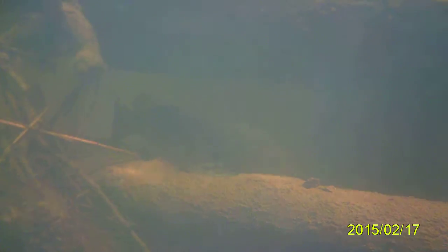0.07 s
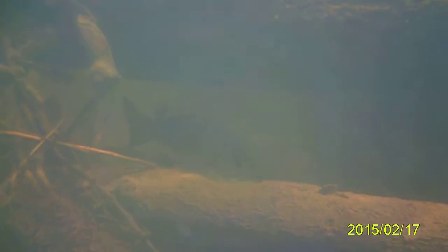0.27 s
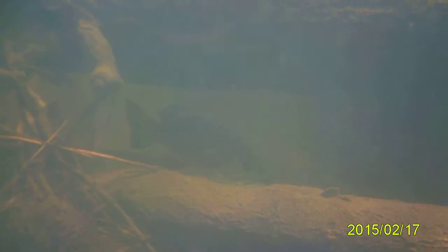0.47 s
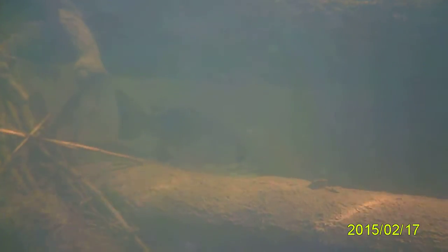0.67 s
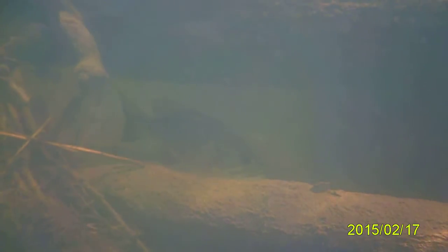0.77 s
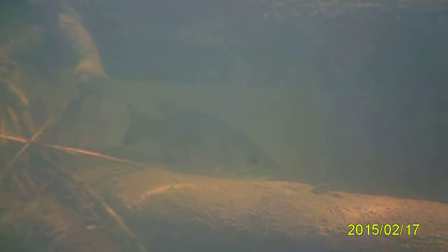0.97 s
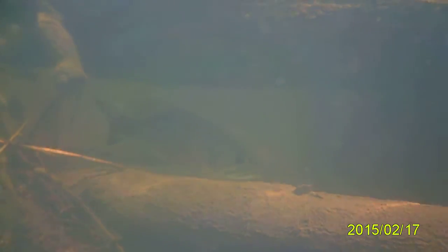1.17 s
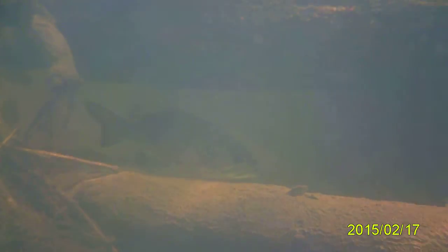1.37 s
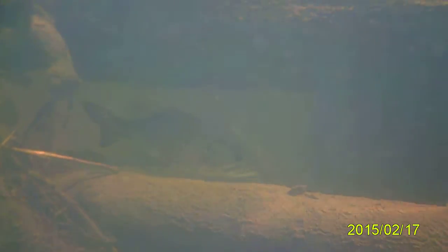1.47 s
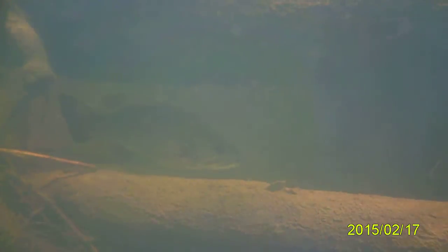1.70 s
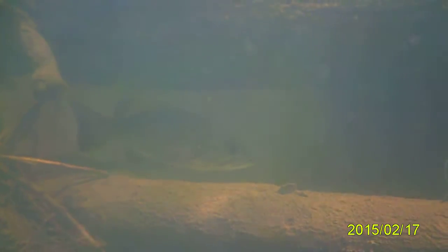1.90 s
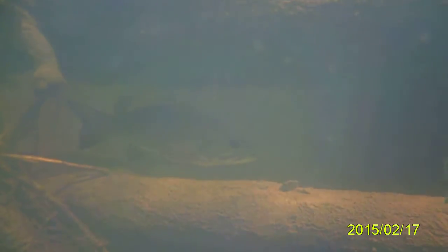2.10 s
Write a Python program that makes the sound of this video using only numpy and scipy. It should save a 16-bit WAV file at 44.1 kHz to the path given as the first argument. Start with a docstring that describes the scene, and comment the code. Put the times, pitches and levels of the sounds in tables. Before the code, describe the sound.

Dull hollow knocks and bubble pops strike a sealed camera underwater, strongest as a quick cluster near 0.7 seconds, then single knocks around 1.6 and 2.0; soft thumps, low river rumble and faint electronic hiss continue.

```python
"""Sealed camera in a slow river

The current pushes on the shell in soft low thumps, and bubbles pop against it as sine bursts of rising pitch.
The air pocket inside rings near 500 Hz and muffles the water above it; noise makes the rumble and murmur.
Under this lie the hiss of the electronics, throbbing in the treble, and a faint whine that switches on and off."""
import sys
import numpy as np
from scipy import signal
from scipy.fft import rfft, irfft
from scipy.io import wavfile

SR = 44100
rng = np.random.default_rng(int(sys.argv[2]) if len(sys.argv) > 2 else 0)


def to_wav(s):
    """Save 16-bit WAV."""
    ch = np.atleast_2d(s).T  # columns
    pcm = np.round(np.clip(ch, -1, 1) * 32767)  # PCM
    wavfile.write(sys.argv[1], SR, pcm.astype(np.int16))


N = 94638

# bubbles against the shell: (t/s, level/dB, starting f/Hz, life/s, level of the shove on the shell/dB,
# direction +1 out -1 in)
BUBBLES = [(0.3591, -27, 255, 0.0069, -23, -1), (0.5794, -21, 302.6, 0.0041, -26, -1),
           (0.7056, -5, 348, 0.005, -15.5, -1), (0.7188, -5, 285.5, 0.0034, -19, -1),
           (0.725, -10.5, 350, 0.0028, -36.5, 1), (0.848, -38, 373, 0.027, -55, 1),
           (1.3345, -28, 327, 0.0091, -50, -1), (1.45, -37.5, 390, 0.014, -57, 1),
           (1.558, -31.5, 376, .007, -52.5, 1), (1.5709, -12, 370, 0.0035, -25.5, 1),
           (1.7060, -35.5, 300, 0.0042, -27, 1), (1.7850, -39, 430, 0.01, -56, 1),
           (1.8590, -40.5, 300, 0.01, -29, 1), (1.989, -12, 340, 0.007, -21, 1),
           (2.126, -38.5, 425, 0.014, -37.5, 1)]


def amp(db):
    """dB to gain."""
    return 10 ** (np.asarray(db) / 20)


def rms_one(x):
    """Scale to rms 1."""
    return x / np.sqrt(np.mean(x ** 2) + 1e-20)


def level_curve(rows):
    """Straight lines between (t/s, level/dB) points, one value per sample."""
    s, db = np.transpose(rows)
    return np.interp(np.arange(N) / SR, s, db)


def drift(rate_hz):
    """Random wandering of rms 1: white noise through two equal low-pass poles at the given rate."""
    r = np.exp(-2 * np.pi * rate_hz / SR)
    noise = rng.standard_normal(N + SR)
    return rms_one(signal.lfilter([1], [1, -2 * r, r * r], noise)[SR:])   # first second settles the filter


def coloured(points):
    """Noise of rms 1, its spectrum drawn through (f/Hz, level/dB) points along log frequency."""
    hz, db = np.transpose(points)
    grid = np.arange(1, N // 2 + 2) * SR / N
    gain = amp(np.interp(np.log(grid), np.log(hz), db))
    return rms_one(irfft(rfft(rng.standard_normal(N)) * gain, N))


def resonate(x, hz, t60):
    """One two-pole resonance, about gain 1 at its peak, ringing down 60 dB in t60 seconds."""
    r = amp(-60 / (t60 * SR))
    w = 2 * np.pi * hz / SR
    return signal.lfilter([(1 - r * r) / 2, 0, (r * r - 1) / 2], [1, -2 * r * np.cos(w), r * r], x + 1e-18)


def gate(spans, edge_s):
    """1 inside the (t/s, length/s) spans, 0 outside, with ramps centred on the span ends."""
    t = np.arange(N) / SR
    return sum(np.clip(np.minimum(t - s, s + length - t) / edge_s + .5, 0, 1) for s, length in spans)


def current_rumble():
    """The river's low rumble: coloured noise whose level follows a slow curve with random lumps."""
    # rumble of the current: (t/s, level/dB)
    rumble_level = [(0.0, -49), (0.16, -47.5), (0.29, -46), (0.61, -39.5), (0.74, -41), (1.19, -46.5),
                    (1.47, -47), (1.86, -45.5), (2.14, -45.5)]
    # its spectrum: (f/Hz, relative level/dB)
    rumble_colour = [(8.8, -29.5), (15, 9), (64, -5.5), (107, -8), (152, -17.5), (206, -9.5), (386, -16),
                     (420, -8), (550, -27), (920, -120)]
    lumps_db = 1.5 * drift(24)
    return amp(level_curve(rumble_level) + lumps_db) * coloured(rumble_colour)


def pocket_murmur():
    """Flow humming in the air pocket: flickering narrow bands of noise near its resonance."""
    # overall hum: (t/s, level/dB)
    hum_level = [(0, -67), (.05, -53.5), (.17, -53), (.2, -49), (.3, -43), (.4, -48), (.45, -43),
                 (.51, -48), (.55, -41.5), (.62, -49.5), (.69, -38), (.72, -46.5), (.77, -42), (.79, -52.5),
                 (.86, -41), (.95, -47.5), (1.09, -46.5), (1.17, -52), (1.21, -42), (1.27, -63),
                 (1.33, -73), (1.37, -50.5), (1.42, -56), (1.5, -51), (1.56, -57.5), (1.65, -55.5),
                 (1.77, -56.5), (1.8, -50), (1.85, -51), (1.95, -47), (2.0, -49.5), (2.09, -53.5),
                 (2.14, -44.5)]
    # noise bands: (centre f/Hz, width/Hz, relative level/dB)
    hum_bands = [(501.6, 57.7, 3), (457, 37, -6.5)]
    flicker_depth_db, flicker_rate_hz = 1.5, 25
    hum = 0
    for hz, width, band_db in hum_bands:
        band = signal.butter(2, [hz - width / 2, hz + width / 2], "band", fs=SR, output="sos")
        flicker_db = flicker_depth_db * drift(flicker_rate_hz)
        noise = rms_one(signal.sosfilt(band, rng.standard_normal(N)))
        hum = hum + amp(band_db + flicker_db) * noise
    return amp(level_curve(hum_level)) * hum


def steady_hiss():
    """Electronic hiss: coloured noise at a constant level."""
    # hiss spectrum: (f/Hz, relative level/dB)
    hiss_colour = [(350, -30.5), (600, -0.5), (693, -12.5), (793, -10.5), (917, -13.5), (1500, -16),
                   (2940, -26.5), (4900, -44.5), (6000, -49), (7800, -76.5), (13200, -120)]
    return amp(-60) * coloured(hiss_colour)


def treble_hiss():
    """Electronic treble hiss: a noise band that throbs in timed swells and flickers at random."""
    # treble spectrum: (f/Hz, relative level/dB)
    treble_colour = [(3240, -40.5), (5500, -17.5), (5850, -15.5), (6960, -5.5), (7480, -2.5), (7920, 5),
                     (8500, -1.5), (8900, -32), (11600, -57), (19600, -120)]
    # swells: (t/s, length/s)
    swells = [(.76, 0.066), (.935, 0.024), (.985, 0.073), (1.12, .06), (1.225, 0.072), (1.375, 0.063),
              (1.49, 0.045), (1.58, 0.058), (1.695, 0.066), (1.775, .065), (1.915, 0.034), (1.98, .06),
              (2.10, .06)]
    base_db, swell_db = -78.5, 5.5
    flicker_depth_db, flicker_rate_hz = 2.5, 90
    level_db = base_db + swell_db * gate(swells, 0.0052) + flicker_depth_db * drift(flicker_rate_hz)
    return amp(level_db) * coloured(treble_colour)


def switched_whine():
    """Electronic whine: a few sine harmonics of one fundamental, gated on and off."""
    # harmonics: (multiple of the fundamental, rms level/dB)
    harmonics = [(5, -99), (6, -81.5), (7, -90.5)]
    # times when it is on: (t/s, length/s)
    on_spans = [(.119, 0.038), (.189, .022), (.271, .091), (.390, 0.02), (.472, .091), (.599, 0.0084)]
    fundamental_hz = 947.5
    t = np.arange(N) / SR
    tone = sum(np.sqrt(2) * amp(db) * np.sin(2 * np.pi * round(k) * fundamental_hz * t) for k, db in harmonics)
    return tone * gate(on_spans, .002)


def shell_thumps():
    """Rounded pushes from current and bubbles; the shell leaks the pressure away and bounces back."""
    # pushes of the current: (t of the crest/s, level/dB, length/s, direction +1 or -1)
    pushes = [(0.041, -39.5, 0.0084, -1), (0.110, -32.5, 0.013, 1), (0.154, -37, 0.02, -1),
              (0.164, -28.5, 0.021, -1), (0.224, -29, 0.028, -1), (0.390, -34, 0.017, -1),
              (0.488, -28.5, 0.022, -1), (0.569, -26.5, 0.018, -1), (0.604, -27, .009, -1),
              (0.619, -49, 0.021, -1), (0.733, -28.5, 0.0044, -1), (0.738, -34, 0.014, -1),
              (0.754, -35, 0.0092, -1), (0.771, -45, 0.011, -1), (0.891, -36, .016, -1),
              (0.985, -27, 0.011, -1), (1.147, -39, 0.015, 1), (1.273, -37, 0.024, 1),
              (1.334, -38, 0.0091, 1), (1.389, -31, 0.041, 1), (1.601, -40, 0.011, 1),
              (1.703, -31.5, 0.012, 1), (1.944, -36.5, 0.0083, 1), (2.006, -23, 0.0031, -1)]
    shove_s = .007   # each bubble's shove begins with its pop
    leak_hz = 24.6
    bounce_hz, bounce_t60_s, bounce_db = 88, .05, 1
    t = np.arange(N) / SR
    shoves = [(s + shove_s / 2, shove_db, shove_s, way) for s, _, _, _, shove_db, way in BUBBLES]
    pressure = 0
    for crest, db, length, way in [*pushes, *shoves]:
        hump = np.cos(np.pi * np.clip((t - crest) / length, -.5, .5)) ** 2
        pressure = pressure + np.sign(way) * amp(db) * hump
    leaky = signal.sosfilt(signal.butter(1, leak_hz, "high", fs=SR, output="sos"), pressure)
    return leaky + amp(bounce_db) * resonate(pressure, bounce_hz, bounce_t60_s)


def bubble_pops():
    """Each bubble is a sine that rises at once and dies in a few cycles while its pitch climbs."""
    top_hz, glide_s = 481, 0.0044   # pitch aimed at, time constant of the climb
    rise_share = 0.077   # time constant of the rise as a share of life
    out = 0
    for s, db, hz, life, _, way in BUBBLES:
        t = np.maximum(np.arange(N) / SR - s, 0)
        turns = top_hz * t - (top_hz - hz) * glide_s * (1 - np.exp(-t / glide_s))
        rise = 1 - np.exp(-t / (rise_share * life))
        decay = np.exp(-(t / life) ** 3)
        out = out + np.sign(way) * amp(db) * rise * decay * np.sin(2 * np.pi * turns)
    return out


def pocket_ring(hits):
    """The air pocket resonates when pops and thumps strike it."""
    return amp(7) * resonate(hits, 495.8, .17)


def shell_tick(hits):
    """A faint higher ring of the shell, struck by the same hits."""
    return amp(-12) * resonate(hits, 800, 0.032)


def muffle(water):
    """The pocket passes little above its range: a steep low-pass, 45 dB down from 641.3 Hz up."""
    return signal.sosfilt(signal.cheby2(8, 45, 641.3, fs=SR, output="sos"), water)


def scene():
    """Water sounds pass the pocket of air; the shell's tick and the electronics add after it."""
    rumble = current_rumble()
    murmur = pocket_murmur()
    electronics = steady_hiss() + treble_hiss() + switched_whine()
    hits = shell_thumps() + bubble_pops()
    water = hits + pocket_ring(hits) + murmur + rumble
    return (muffle(water) + shell_tick(hits) + electronics)[None]


def record(dry):
    """The top is cut, 70 dB down from 9100 Hz up; a faint white floor is added after the cut."""
    cut = signal.sosfilt(signal.cheby2(12, 70, 9100, fs=SR, output="sos"), dry)
    return cut + amp(-103) * rng.standard_normal(dry.shape)


dry = scene()
out = record(dry)
to_wav(out)
```